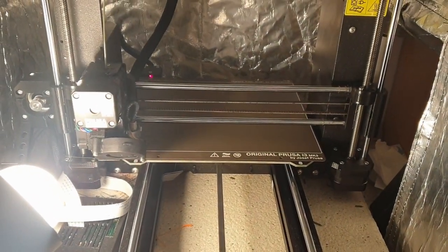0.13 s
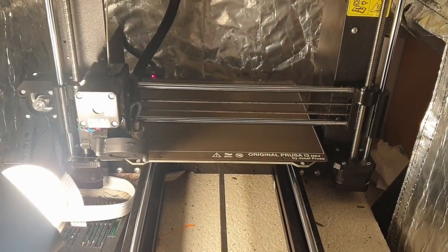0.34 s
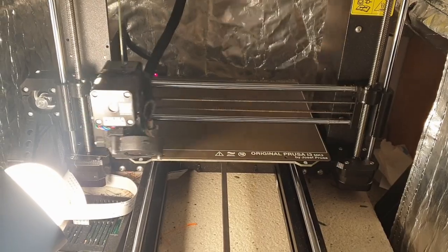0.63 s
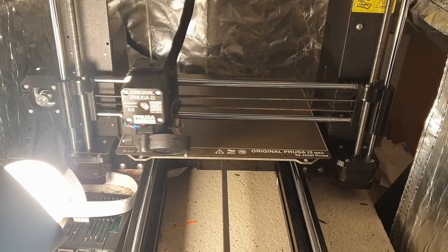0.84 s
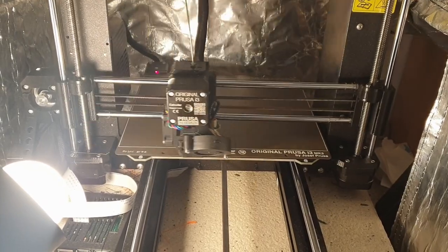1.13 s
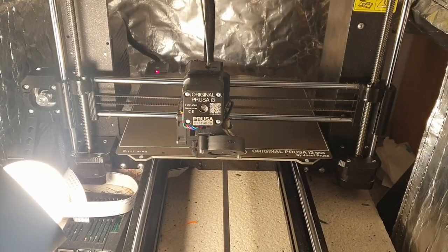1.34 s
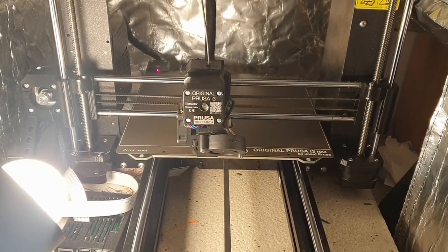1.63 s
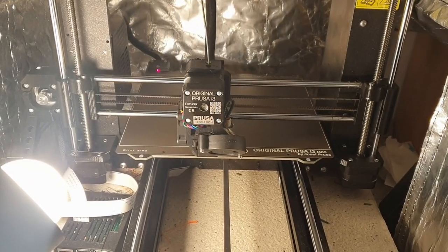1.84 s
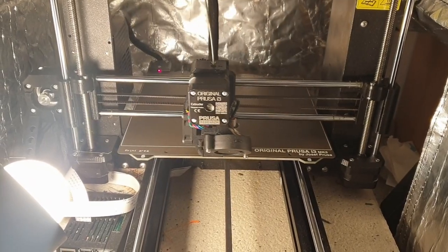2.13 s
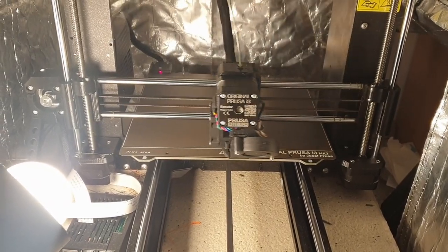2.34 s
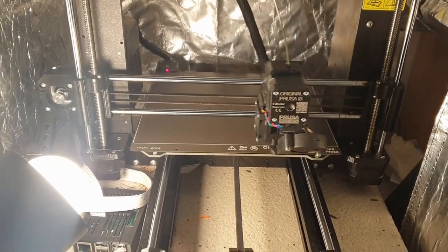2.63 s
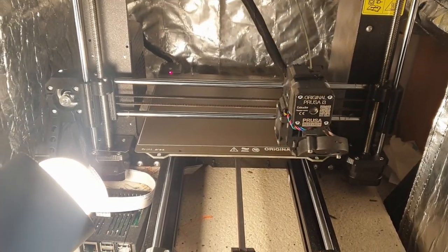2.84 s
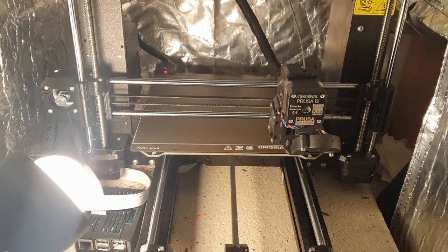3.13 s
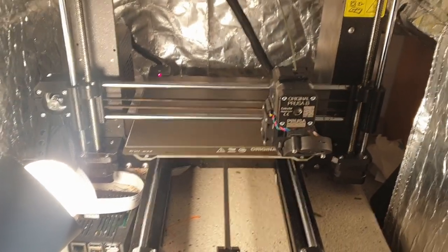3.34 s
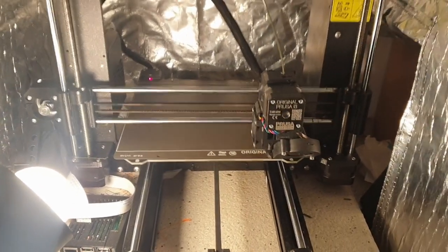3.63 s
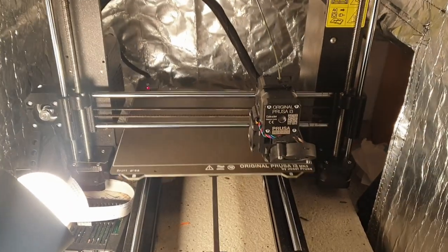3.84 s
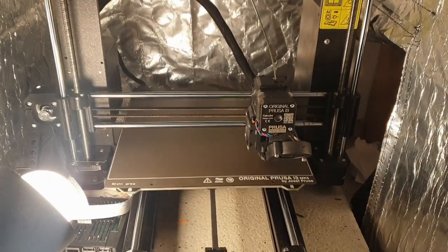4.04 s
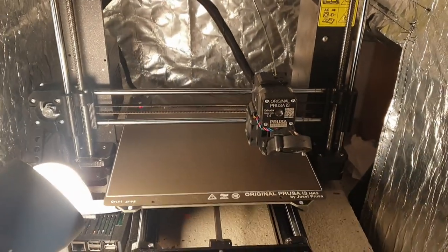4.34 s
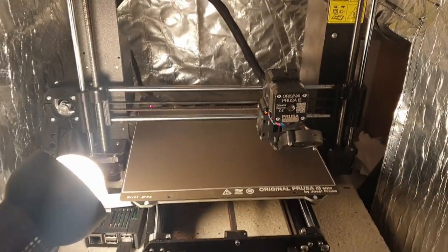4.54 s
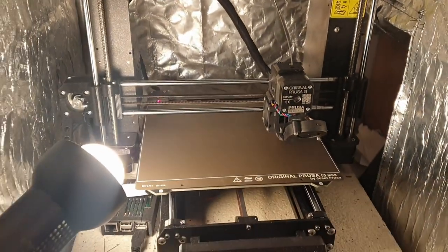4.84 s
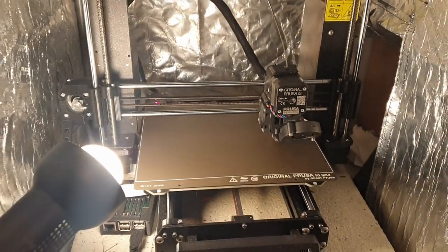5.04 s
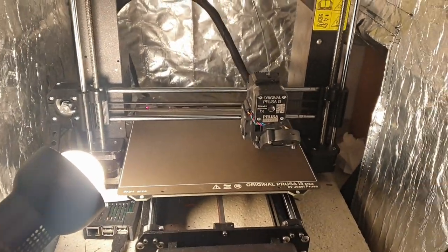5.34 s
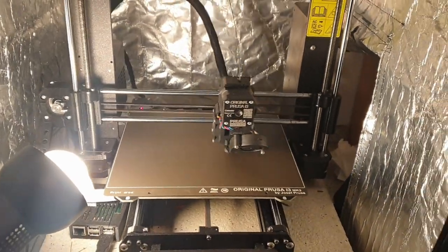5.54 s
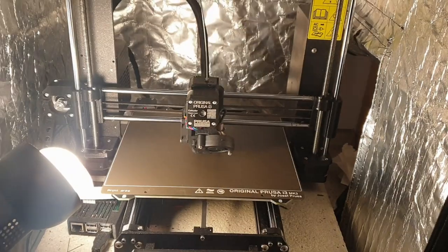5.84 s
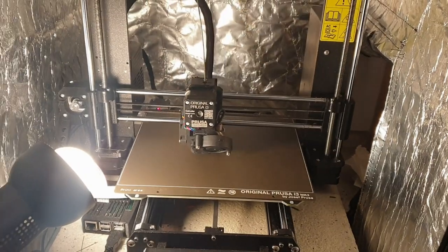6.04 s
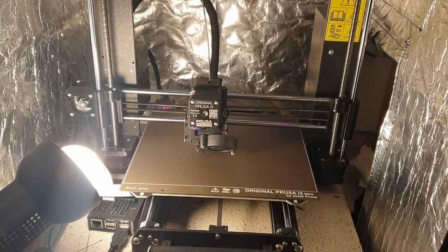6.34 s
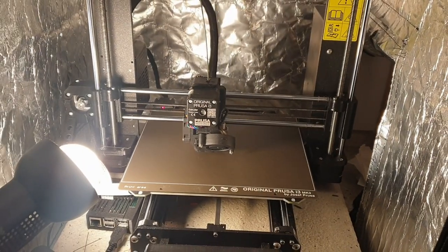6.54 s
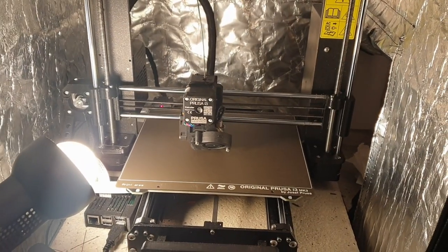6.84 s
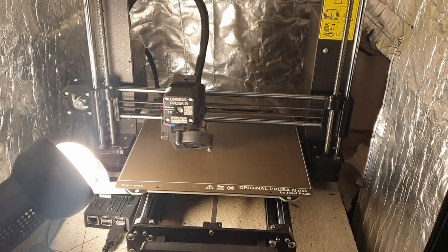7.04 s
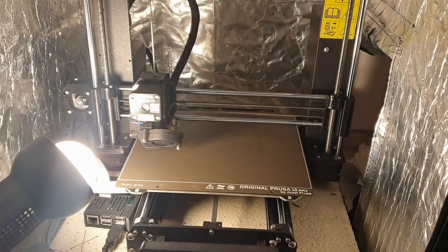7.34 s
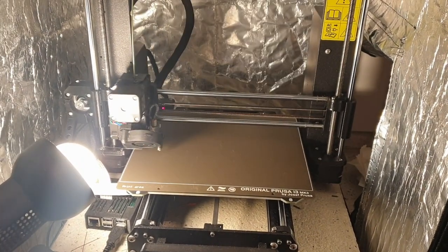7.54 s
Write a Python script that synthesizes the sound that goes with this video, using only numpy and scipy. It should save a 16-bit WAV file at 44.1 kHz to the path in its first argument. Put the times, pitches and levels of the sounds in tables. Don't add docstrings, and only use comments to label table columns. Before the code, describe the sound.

Close up, a small machine repeats whirring motor sweeps with hissy, rattly edges, pausing for short dull knocks and ticks while a fan blows.

```python
import sys
import numpy as np
from scipy import signal
from scipy.fft import rfft, irfft, next_fast_len
from scipy.io import wavfile
from scipy.ndimage import uniform_filter1d, map_coordinates

SR = 44100
rng = np.random.default_rng(int(sys.argv[2]) if len(sys.argv) > 2 else 0)


def to_wav(s):
    ch = np.atleast_2d(s).T
    pcm = np.round(np.clip(ch, -1, 1) * 32767)
    wavfile.write(sys.argv[1], SR, pcm.astype(np.int16))


def voltage_ratio(level):
    return 10 ** (np.asarray(level, float) / 20)


N = 338555
T = np.arange(N) / SR
STEP_HZ = 233.2


def unit(x):
    return x / np.sqrt(np.mean(x ** 2) + 1e-20)


def along(points, hz):
    f, v = np.transpose(points)
    return np.interp(np.log(hz + 1), np.log(f + 1), v)


def level(rows, t=T):
    times, db = np.transpose(rows)
    inside = np.minimum(t + .03 - times[0], times[-1] + .03 - t)
    return np.clip(inside / .03, 0, 1) * voltage_ratio(np.interp(t, times, db))


def wobble(rate, count=N):
    knots = rng.standard_normal(int(count * rate / SR) + 4)
    coarse = map_coordinates(knots, [np.arange(count // 16 + 2) * 16 * rate / SR])
    return np.interp(np.arange(count) / 16, np.arange(len(coarse)), coarse)


def filtered(x, response):
    n = x.shape[-1]
    m = next_fast_len(n + 8192)
    return irfft(rfft(x, m) * response(np.fft.rfftfreq(m, 1 / SR)), m)[..., :n]


def noise(gain, gate=np.ones(N)):
    return unit(filtered(gate * rng.standard_normal((2, len(gate))), gain))


def peak(hz, centre, width, power=2):
    return 1 / (1 + ((hz - centre) / width) ** power)


MOVE_STARTS = [
    .486,
    2.048,
    3.618,
    5.215,
    6.785,
]


def moves():
    ramp_s, cruise_s = .19, .548
    return [(s, s + ramp_s, s + ramp_s + cruise_s, s + 2 * ramp_s + cruise_s) for s in MOVE_STARTS]


def speed(move):
    return np.interp(T, move, [0, 1, 1, 0])


# (time [s], low sway [dB], upper sway [dB], holding whine [dB], fan [dB])
RESTS_AT_POINTS = [
    (.25, -52.5, -46.5, -90, 2),
    (1.8, -51.5, -51, -60, -2.5),
    (3.3, -48, -46.5, -60, 2.5),
    (4.9, -47, -51.5, -65, 7.5),
    (6.5, -45.5, -55, -54, 1.5),
    (7.68, -49, -41, -56, -1),
]


def resting(column):
    rows = np.array(RESTS_AT_POINTS)
    return voltage_ratio(np.interp(T, rows[:, 0], rows[:, column]))


# (frequency [Hz], level per Hz [dB])
FAN_COLOUR = [(150, -4), (260, -2.5), (836, -16), (1060, -6.5), (1980, -6), (2830, -19), (3310, -35),
              (4070, -31.5), (5170, -41), (5630, -21.5), (7400, -23), (9200, -19), (14500, -5.5),
              (15800, -9)]
# (frequency [Hz], level per Hz [dB])
RUMBLE_COLOUR = [(12, -57), (24, -48), (45, -5), (119, -18), (156, -2), (200, -4), (260, -30), (440, -120)]


def fan():
    air = noise(lambda f: voltage_ratio(along(FAN_COLOUR, f)), voltage_ratio(5.0 * wobble(3.1)))
    rumble = noise(lambda f: voltage_ratio(along(RUMBLE_COLOUR, f)), voltage_ratio(5.5 * wobble(2.96)))

    def whine_colour(f):
        bands = peak(f, 15200, 1200) + 0.43 * peak(f, 11600, 900)
        return bands / (1 + (6000 / (f + 1)) ** 6)

    whine = noise(whine_colour)
    idle = 1 - sum(speed(move) for move in moves())
    return resting(4) * voltage_ratio(-57) * air + voltage_ratio(-65.0) * rumble + voltage_ratio(2.5) * idle * resting(3) * whine


# (time [s], level [dB])
CLOTH_SPELLS = [
    [(2.9, -66), (3.408, -72.5), (3.492, -56.5), (3.576, -77), (3.7, -84)],
    [(4.45, -58), (4.65, -60), (4.954, -51.5), (5.194, -67), (5.3, -83)],
    [(6.05, -56.5), (6.26, -73), (6.3, -72)],
]
# (time [s], length [s], low edge [Hz], high edge [Hz], level [dB])
CLOTH_RUBS = [(3.116, 0.016, 7600, 6600, -54), (3.481, 0.077, 7800, 21000, -45.5),
              (3.668, 0.056, 150, 1200, -52.5), (3.775, 0.048, 200, 244, -43),
              (4.974, 0.12, 120, 2350, -45), (7.554, 0.15, 50, 100, -60), (4.85, 0.66, 150, 660, -72),
              (4.1, 0.0042, 4600, 18000, -51), (1.436, 0.079, 4000, 9200, -78.5),
              (4.17, 0.065, 35, 86, -45), (4.203, 0.081, 30, 93, -51)]


def rustle():
    def fine_colour(f):
        dip = 1 - 0.58 * peak(f, 8700, 1300, 4)
        return dip / (1 + (2500 / (f + 1)) ** 4) / (1 + (f / 12500) ** 6)

    fine = noise(fine_colour, voltage_ratio(1.3 * wobble(90)))
    out = sum(level(rows) for rows in CLOTH_SPELLS) * voltage_ratio(-3.5) * fine
    half = SR // 2
    for s, length, low_hz, high_hz, db in CLOTH_RUBS:
        i = min(round((s - .2) * SR), N - half)
        near = slice(i, i + half)
        stroke = np.exp(-np.abs((T[near] - s) / (length / 2)) ** 3)
        band = lambda f: 1 / np.sqrt((1 + (low_hz / (f + 1)) ** 6) * (1 + (f / high_hz) ** 10))
        out[:, near] += voltage_ratio(db) * stroke * noise(band, voltage_ratio(0.36 * wobble(151, count=half)))
    note = np.cos(2 * np.pi * np.cumsum(np.interp(T, [4.92, 5.03], [480, 250])) / SR)
    stroke = np.exp(-((T - 4.975) / 0.076) ** 4)
    return out + voltage_ratio(-44.5) * stroke * note * noise(lambda f: peak(f, 0, 60))


# (time [s], t60 [s], level [dB])
PART_TICKS = [(1.436, 0.1, -47.5), (1.806, 0.09, -66), (2.137, 0.47, -49), (3.006, 0.11, -45),
              (3.354, 0.085, -56), (3.651, .1, -59), (4.564, 0.062, -46), (4.68, 0.28, -54),
              (5.237, 0.23, -52), (6.275, 0.33, -60), (6.436, 0.31, -54.5), (6.55, 0.17, -58),
              (6.656, 0.18, -54), (6.772, 0.44, -55), (6.879, .15, -61)]
# (frequency [Hz], width [Hz], level [dB])
PART_MODES = [
    (570, 80, -14),
    (1090, 140, -2),
    (1440, 92, 0),
    (1690, 110, -13),
    (2070, 170, -5.5),
    (2700, 440, -19.5),
]


def ticks():
    shake, t = np.zeros(N + SR), np.arange(SR // 3) / SR
    for s, t60, db in PART_TICKS:
        shake[round(s * SR):][:len(t)] += voltage_ratio(db - 60 * t / t60) * (1 - np.exp(-t / 0.0017))
    return shake[:N] * noise(lambda f: sum(voltage_ratio(db) * peak(f, c, w / 2) for c, w, db in PART_MODES))


# (time [s], length [s], frequency [Hz])
BED_NOTES = [(3.78, .04, 1410), (3.85, .086, 572), (3.95, .06, 1160), (3.97, .1, 480), (4.017, .048, 577),
             (4.04, .06, 1450), (4.08, .1, 1390), (4.16, .08, 610), (4.258, .08, 580), (4.36, .04, 586),
             (4.39, .04, 800), (4.41, .03, 581), (4.44, .08, 240), (4.45, .03, 575)]
BED_NOTE_DB = [-51, -48.5, -54, -62, -39.5, -50, -51, -53, -67, -54, -52, -49, -51.5, -55]
# (time [s], length [s], frequency [Hz], level [dB])
CARRIAGE_NOTES = [(.52, 0.027, 1674, -55), (0.62, 0.025, 1090, -50), (0.68, .025, 1690, -45),
                  (.74, .03, 1080, -52), (1.26, .04, 1690, -55), (1.298, 0.036, 570, -54.5),
                  (1.33, .03, 1090, -56), (1.368, 0.045, 554, -59), (2.164, 0.059, 1090, -57),
                  (2.174, 0.049, 603, -61), (2.667, 0.014, 400, -55), (2.844, 0.097, 618, -63),
                  (5.26, 0.025, 1090, -51), (5.355, 0.027, 1090, -52), (5.362, 0.057, 600, -57),
                  (5.45, 0.035, 1100, -43), (5.825, 0.06, 1090, -45.5), (6.04, 0.053, 1064, -50),
                  (6.102, 0.039, 1064, -53.5), (6.043, 0.12, 630, -61), (7.45, 0.085, 1660, -48),
                  (7.616, 0.056, 600, -62.5), (7.607, 0.082, 1090, -49)]


def bed():
    note, waver = np.zeros(N), .08 * wobble(60)
    bed_notes = [(*row, db) for row, db in zip(BED_NOTES, BED_NOTE_DB)]
    for s, length, hz, db in bed_notes + CARRIAGE_NOTES:
        near = slice(round((s - .2) * SR), round((s + .2) * SR))
        swell = np.exp(-((T[near] - s) / (length / 2)) ** 2)
        note[near] += voltage_ratio(db + 2.0) * swell * np.sin(2 * np.pi * (hz * T[near] + waver[near]))
    return np.outer([1, .4], note)


# (final lift [s], nudge period [s], nudge [dB], rebound [dB], lift [dB])
PROBINGS = [
    (0.466, 0.09, -51, -37, -35),
    (2.035, 0.11, -36, -64, -33),
    (3.608, 0.12, -33, -38.5, -29.5),
    (5.204, .1147, -35.5, -42.5, -33.5),
    (6.776, 0.11, -35.5, -47.5, -34.5),
]
# (time [s], peak level [dB], frequency [Hz])
HEAD_JOLTS = [(0.019, -35.5, 161), (0.066, -51, 145.5), (1.387, -33, 154.6), (1.428, -29, 165.4),
              (1.577, -38, 157), (2.127, -38, 172.4), (2.163, -35.5, 156.5), (2.218, -39.5, 177),
              (2.816, -39, 179.4), (2.951, -29, 181), (2.987, -26, 152), (3.035, -32, 176),
              (3.073, -33, 172), (3.146, -31, 157), (3.214, -38.5, 167), (3.702, -43, 146.5),
              (4.522, -30.5, 174), (4.555, -30, 149.6), (4.592, -30.5, 141.3), (4.707, -35, 159),
              (4.746, -37, 164.4), (6.121, -31.5, 167.7), (6.19, -29.5, 155.7), (6.305, -35.5, 151),
              (6.348, -39, 159), (6.948, -43.5, 171), (7.578, -40, 162)]


def kicks():
    nudge_hz, rebound_hz, lift_hz = 159, 154.2, 167.3
    rows = list(HEAD_JOLTS)
    for s, period, nudge_db, rebound_db, lift_db in PROBINGS:
        rows += [(s, lift_db, lift_hz), (s + .05, lift_db + 1, nudge_hz)]
        for k in (1, 2, 3):
            nudge = s - k * period
            rows += [(nudge, nudge_db, nudge_hz), (nudge + .041, rebound_db, rebound_hz)]
    return rows


def gantry_db():
    hush = np.zeros(N)
    for (start, full, brake, stop), (*_, hush_db) in zip(moves(), MOVE_LOAD):
        hush += hush_db * np.interp(T, [start + 0.11, full + 0.13, brake + 0.0085, stop], [0, 1, 1, 0])
    peaks = [s - k * period + 0.091 for s, period, *_ in PROBINGS for k in (1, 2, 3, 4)]
    return hush, 1.5 * sum(np.exp(-((T - s) / 0.0092) ** 2) for s in peaks)


# (time [s], level [dB])
LOOSENESS = [
    (0, -8),
    (1.4, -4),
    (1.8, -1.5),
    (3.3, -0.5),
    (5.9, 4),
    (6.5, -1.5),
    (7.68, 12),
]


def lift():
    ring, shake, t = np.zeros(N + SR), np.zeros(N + SR), np.arange(SR // 6) / SR
    swell = ((t / .024) * np.exp(1 - t / .024)) ** 7
    tail = 0.27 * np.exp(-t / 0.14) * (1 - np.exp(-t / 0.027))
    for s, db, hz in kicks():
        phase, stray = rng.random(2)
        stray_hz = hz + 2.13 * (2 * stray - 1)
        i = max(round((s - .013) * SR), 0)
        ring[i:i + len(t)] += voltage_ratio(db - 3.5) * (swell + tail) * np.sin(2 * np.pi * (stray_hz * t + phase))
        shake[i:i + len(t)] += voltage_ratio(db - 28) * swell

    hush_db, surge_db = gantry_db()
    hum = voltage_ratio(2.4 * wobble(13)) * np.sin(2 * np.pi * np.cumsum(86 + 3 * wobble(14)) / SR)
    hum = hum + 0.53 * noise(lambda f: peak(f, 78, 26, 4))[0]
    sway = resting(1) * voltage_ratio(hush_db + surge_db) * hum
    upper = resting(2) * voltage_ratio(1.3 * hush_db) * noise(lambda f: peak(f, 150, 24))[0]

    clatter = noise(lambda f: peak(f, 1500, 800, 4) + 1.95 * peak(f, 330, 80))
    loose = level(LOOSENESS) * uniform_filter1d(shake[:N], size=700) * 1.22 * clatter
    low = ring[:N] + sway + upper
    return loose + [low, np.roll(low, 90)]


def step_note(t, v, turns, swell):
    note = level(swell, t) * voltage_ratio(6.5) * np.clip(v / 0.15 - 1.5, 0, 1) * np.sin(2 * np.pi * turns)
    return np.array([note, np.zeros(len(t))])


def cogging(t, v, turns, driver_db):
    ramp = voltage_ratio(driver_db - 5.5 + 2.6 * wobble(44.75, count=len(t))) * np.sqrt(np.abs(v * (1 - v)))
    out = np.zeros(len(t))
    for k, share in ((1, 0.9), (2, 0.89)):
        mode = 0.25 + voltage_ratio(14.5) * .5 * peak(k * v * STEP_HZ, 169, 59)
        out += mode * np.sin(2 * np.pi * (k * turns + rng.random())) * share
    return ramp * out * [[1], [.3]]


LOW_MULTIPLES = [2, 3, 5, 6, 7, 12]


def locked_tones(t, v, turns, tones, glide, low_db, fourth_db):
    out = np.zeros((2, len(t)))
    cruise = t[v > .99][[0, -1]]
    for hz, db in list(tones) + list(zip(np.multiply(LOW_MULTIPLES, STEP_HZ), low_db)):
        order = round(hz / STEP_HZ)
        whine = order == 28
        if whine:
            blur = 3.3 * (1 - v ** 8) * wobble(260, count=len(t))
        else:
            blur = (order <= 12) * 0.26 * wobble(25.3, count=len(t))
        driven = abs(hz / STEP_HZ - order) < .05
        cycles = order * turns + blur * .3 if driven else hz * t
        early = glide * np.clip((v - .72) / .05, 0, 1) * whine * (1 - v ** 30)
        lock = np.maximum(np.clip((v - .92) / 0.12, 0, 1), early)
        drift_db, lift_db = (2.2, 8.5) if order > 12 else (3.2, 5.0)
        if order == 4:
            db = db + np.interp(t, np.linspace(*cruise, len(fourth_db)), fourth_db)
        for ear in out:
            gain = voltage_ratio(db + lift_db + drift_db * wobble(10.5, count=len(t)))
            ear += lock * gain * np.sin(2 * np.pi * (cycles + rng.random()))
    return out


def step_comb(t, v, turns, colour, driver_db):
    orders = np.arange(9, 68)[:, None]
    colour_db = np.where(orders > 12, along(colour, orders * STEP_HZ), -8)
    sizes = voltage_ratio(colour_db + 2 * rng.standard_normal(orders.shape))
    fade_hz = rng.uniform(4, 14, orders.shape)
    fade = 1 + 1.7 * np.sin(2 * np.pi * (fade_hz * t[::64] + rng.random(orders.shape)))
    wheel = np.broadcast_to(np.complex64(np.exp(2j * np.pi * turns)), (len(orders) + 1, len(t)))
    phase = np.complex64(np.exp(2j * np.pi * rng.random(orders.shape)))
    wheel = np.cumprod(wheel, axis=0)[1:] * phase
    comb = np.repeat(np.float32(sizes * fade), 64, axis=1)[:, :len(t)] * wheel.imag
    flip = np.float32(rng.choice([-1., 1.], len(orders)))
    return unit(np.array([comb.sum(0), flip @ comb])) * voltage_ratio(driver_db - 11.0) * v ** 12


# (frequency [Hz], level per Hz [dB])
RATTLE_COLOUR = [(150, -40), (250, -1.5), (292, -19.5), (400, -11.5), (500, -8.5), (842, -15), (920, -13.5),
                 (1090, 0), (1300, -6), (3500, -14.5), (4550, -34), (7700, -120)]


def rattle(t, turns, shake, frame):
    grains = voltage_ratio(1.84 * wobble(160, count=len(t)) + 1.0 * wobble(7.63, count=len(t)))
    grains = grains * (1 + 0.074 * np.cos(2 * np.pi * turns))
    modes = lambda f: sum(voltage_ratio(db) * w / np.hypot(2 * (f - c), w) for c, w, db in frame)
    clatter = noise(lambda f: voltage_ratio(along(RATTLE_COLOUR, f)) * (1 + 2.15 * modes(f)), grains)
    return level(shake, t) * voltage_ratio(-0.5) * clatter


def hiss(t, v, turns, colour, driver_db, edge_db):
    gate = voltage_ratio(0.89 * wobble(200, count=len(t)) + 0.47 * wobble(10.0, count=len(t)))
    gate = gate * (1 + 0.063 * np.cos(2 * np.pi * turns))
    hz, frames, z = signal.stft(noise(lambda f: voltage_ratio(along(colour, f)), gate), SR, nperseg=256)
    hz = hz[:, None]
    v = np.interp(frames, t - t[0], v)
    over = hz - (27000 - 23500 * v)
    ridge = voltage_ratio(edge_db - 8.0) * np.exp(-(over - 900) ** 2 / np.where(over > 900, 3200, 1700) ** 2)
    ridge = ridge * (1 - v ** 4) * np.clip(hz / 2500 - 3.3, 0, 1)
    fill = np.maximum(1 / (1 + np.exp(-np.clip(over / 800, -20, 20))), v ** 1.98)
    return voltage_ratio(driver_db) * signal.istft(z * (fill + ridge), SR, nperseg=256)[1][:, :len(t)]


# (rattle at full speed [dB], rattle at braking [dB], flare while braking [dB], gantry hush [dB])
MOVE_LOAD = [
    (-49.5, -53, 6.5, -14.5),
    (-50, -48.5, 1.5, -11.5),
    (-46, -43.5, -6, -12.5),
    (-48.5, -48, -0.8, -20.5),
    (-50, -45.5, -5, -22),
]
# (at full speed [dB], swell after that [s], swell [dB], at braking [dB])
STEP_NOTE = [
    (-57, 0.18, -51, -66),
    (-58, 0.22, -68, -57),
    (-62.5, 0.28, -57.5, -60),
    (-64.5, 0.18, -53, -78),
    (-62, 0.41, -64, -54.5),
]
# (frequency [Hz], rms level [dB])
STEP_TONES = [
    [(931.3, -62), (1868, -60), (6530, -60), (7230, -67), (7461, -64), (8161, -68), (11892, -68),
     (12592, -71), (13291, -71), (14223, -68), (14691, -60), (15149, -64)],
    [(931.3, -60), (1868, -61), (6530, -59), (7230, -62), (7461, -66), (8161, -65), (11429, -69),
     (12592, -66), (12823, -67), (14223, -62), (14691, -58), (15154, -60)],
    [(570.6, -59), (608, -61), (802, -67), (1028, -63), (1087, -63), (1507, -62), (931.3, -54), (1868, -58),
     (6530, -59.5), (6761, -69), (7693, -67), (8393, -70), (11660, -57), (11892, -61), (12592, -57),
     (14460, -65), (15159, -61)],
    [(931.3, -59.5), (1109, -66), (6530, -59), (7230, -64), (8629, -67), (11192, -65), (11660, -61.5),
     (12592, -61), (13297, -67), (14923, -69), (15391, -66), (15622, -63)],
    [(699.8, -67), (931.3, -55.5), (1669, -61), (6530, -62), (7230, -62), (8629, -64.5), (11660, -62),
     (12592, -62), (4662, -67), (14228, -63), (15391, -59), (15622, -62)],
]
LOW_MULTIPLE_DB = [
    [-72, -67.5, -63, -64, -76, -69],
    [-82, -71, -75, -75, -58, -74],
    [-61, -60, -58, -55.5, -63, -62.5],
    [-69, -72, -70, -65, -64, -68],
    [-69, -79, -59.5, -65, -70, -65],
]
FOURTH_MULTIPLE_DB = [
    [3, 0.2, 4, -13],
    [5.5, 3.2, -5, -6],
    [-3, -1.3, 8, 4],
    [-13, -2.6, 7.5, 1],
    [-8, -0.69, 1.5, -4],
]
RAMP_WHINE = [
    .25,
    .4,
    1.0,
    .7,
    1.2,
]
# (frequency [Hz], width [Hz], level [dB])
FRAME_MODES = [
    [(716, 9.7, 9), (930, 17, 0), (1064, 20, 1.5), (1630, 120, -1.5), (1960, 36, 2)],
    [(940, 23, -7), (1140, 120, -38), (1660, 27, -4), (1886, 27, 4.5), (2770, 34, -3)],
    [(606, 47, -0.5), (910, 24, -20), (1395, 36, -11), (1825, 34, 1.5), (2500, 82, -7)],
    [(943, 19, 5), (1090, 10, -11), (1390, 11, -1), (1903, 33, 1), (2820, 32, -11)],
    [(700, 15, 8.5), (1000, 65, 5), (1534, 62, 8), (1878, 42, 10.5), (2840, 43, 3)],
]
# (frequency [Hz], level per Hz [dB])
HISS_COLOUR = [
    [(1650, -21), (2800, -8), (3170, -16.5), (5990, -12.5), (6600, -9), (6920, -10.5), (9590, -14),
     (13400, -4.5), (14800, 0), (15800, -6)],
    [(1650, -39), (2800, -18), (4780, -14.5), (5370, -17.5), (6530, -9.5), (6870, -9.5), (9110, -15),
     (13600, -4), (14800, -1), (15800, -11.5)],
    [(1650, -20), (2800, -10), (5330, -12), (6770, -7), (7070, -8), (9050, -19), (11700, -2), (13200, -14),
     (15000, -4.5), (15800, -9)],
    [(1650, -23), (2800, -11), (3500, -16.5), (5290, -14), (6920, -9.5), (9050, -17.5), (11600, -5),
     (13200, -10.5), (15100, 1), (15800, -9.5)],
    [(1650, -17), (2800, 0.5), (3450, -12), (4580, -4), (5110, -6), (6800, -2.5), (7830, -7.5),
     (9590, -10.5), (11700, 0), (15800, -1.5)],
]
# (at full speed [dB], extra along the folding edge [dB])
DRIVER_LEVEL = [
    (-47, 16.5),
    (-46, 16.5),
    (-44, 19),
    (-44.5, 14.5),
    (-44.5, 16.5),
]


def travel():
    out = np.zeros((2, N))
    for i, move in enumerate(moves()):
        start, full, brake, stop = move
        on = (T > start - .1) & (T < stop + .2)
        t, v = T[on], speed(move)[on]
        turns = np.cumsum(v) * STEP_HZ / SR
        full_db, swell_s, swell_db, brake_db = STEP_NOTE[i]
        swell = [(start, full_db), (full, full_db), (full + swell_s, swell_db),
                 (brake, brake_db), (stop, brake_db)]
        early_db, late_db, flare_db, _ = MOVE_LOAD[i]
        shake = [(start, early_db - 13.5), (start + 0.068, early_db - 14.5), (full - .03, early_db),
                 (brake, late_db), (brake + 0.084, late_db + flare_db),
                 (stop - .03, early_db - 12), (stop + 0.076, early_db - 13.5)]
        colour, (driver_db, edge_db) = HISS_COLOUR[i], DRIVER_LEVEL[i]
        out[:, on] += step_note(t, v, turns, swell)
        out[:, on] += cogging(t, v, turns, driver_db)
        out[:, on] += locked_tones(t, v, turns, STEP_TONES[i], RAMP_WHINE[i],
                                   LOW_MULTIPLE_DB[i], FOURTH_MULTIPLE_DB[i])
        out[:, on] += step_comb(t, v, turns, colour, driver_db)
        out[:, on] += rattle(t, turns, shake, FRAME_MODES[i])
        out[:, on] += hiss(t, v, turns, colour, driver_db, edge_db)
    return out


# (frequency [Hz], left-right correlation)
EAR_LIKENESS = [
    (30, 0.092),
    (60, 0.85),
    (200, 0.9),
    (400, 0.65),
    (700, 0.71),
    (1400, 0.72),
    (3000, 0.061),
    (15000, 0.45),
]


def spread(pair):
    turn = lambda hz: np.arccos(np.clip(along(EAR_LIKENESS, hz), -1, 1)) / 2
    mid, side = filtered(pair, lambda hz: np.array([1 + 0 * hz, np.tan(turn(hz))]))
    return np.array([mid + side, mid - side])


def scene():
    return spread(fan() + rustle() + ticks() + bed() + lift() + travel())


def top_cut(x):
    return signal.sosfilt(signal.butter(12, 16990, fs=SR, output="sos"), x)


# (frequency [Hz], left minus right [dB])
MIC_BALANCE = [
    (60, -3.5),
    (110, 0.5),
    (200, 5),
    (380, 1.5),
    (700, 2),
    (1290, -3),
    (2380, -4.5),
    (4400, 16.5),
    (8120, 0),
    (15000, 5),
]
# (frequency [Hz], left leads by [rad])
MIC_LEAD = [
    (300, 0.19),
    (700, 0.46),
    (1300, 1.44),
    (15000, 1.6),
]


def record(dry):
    half = np.array([[.5], [-.5]])

    def ports(hz):
        colour = voltage_ratio(along(MIC_BALANCE, hz) * half)
        phase = np.exp(1j * along(MIC_LEAD, hz) * half)
        return colour * phase * (hz < 15950)

    return top_cut(filtered(dry, ports))


dry = scene()
out = record(dry)
to_wav(out)
```